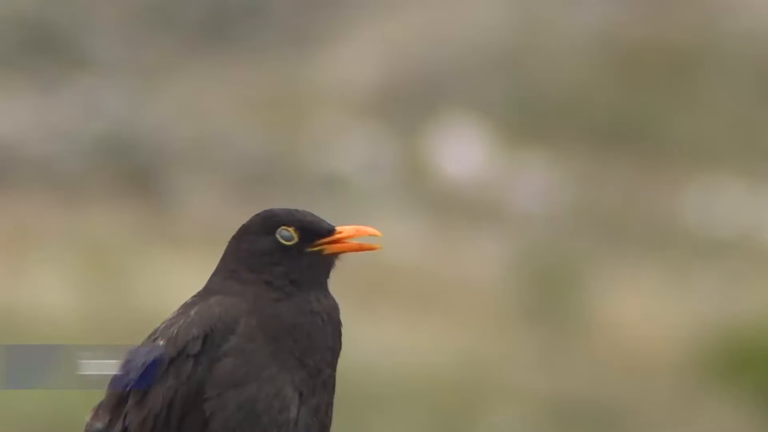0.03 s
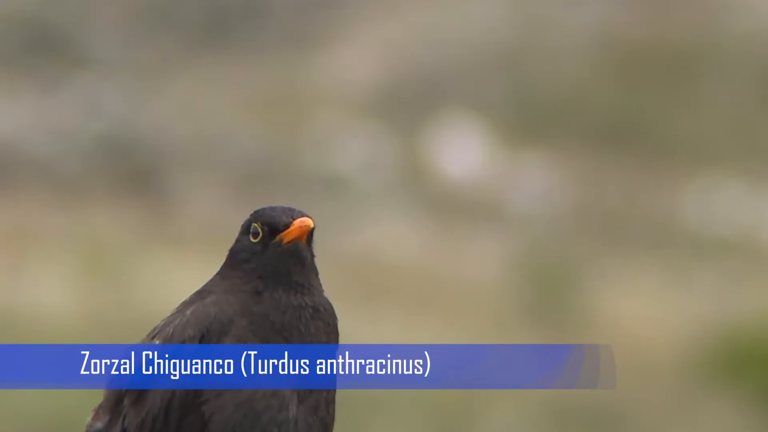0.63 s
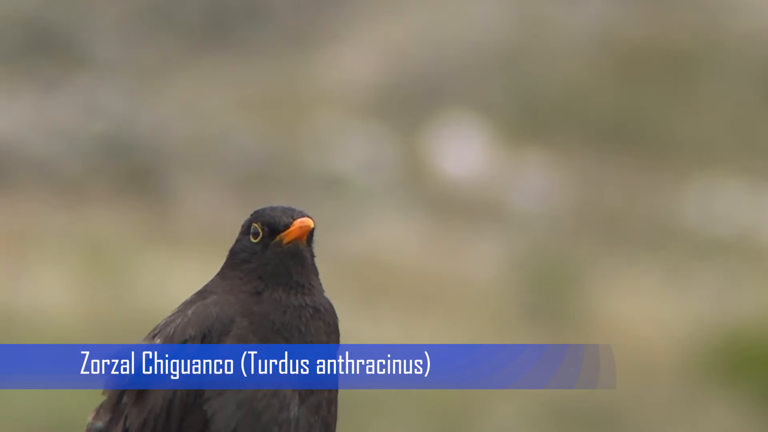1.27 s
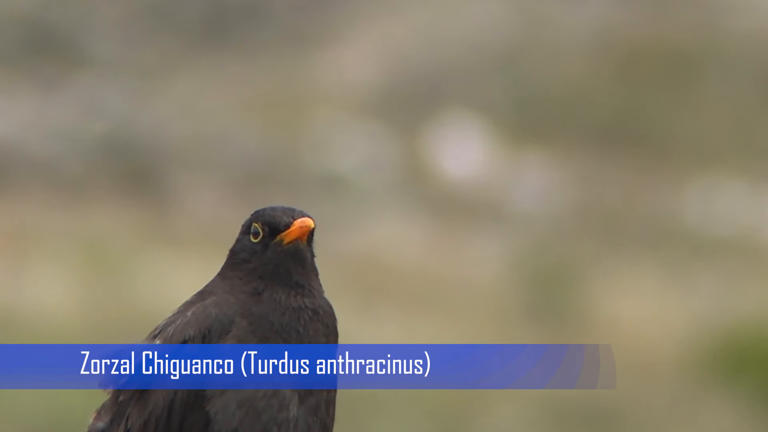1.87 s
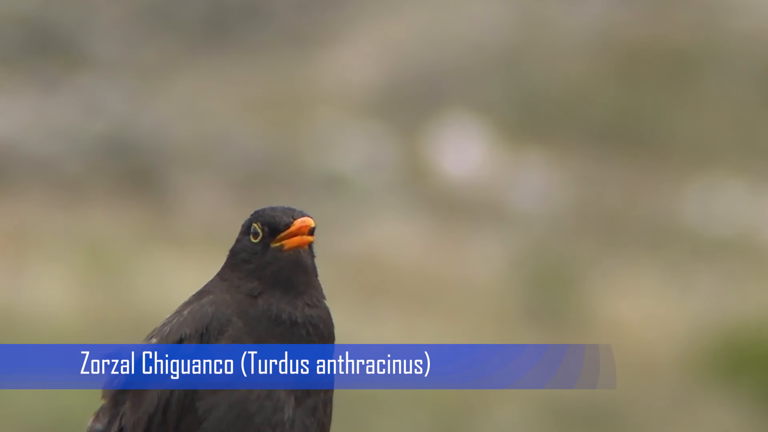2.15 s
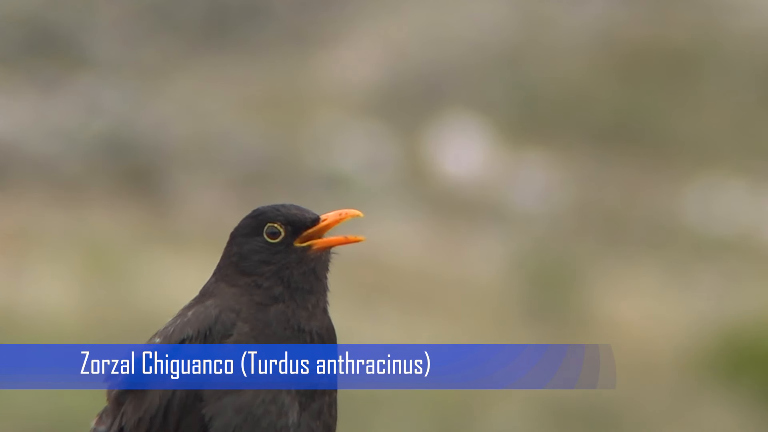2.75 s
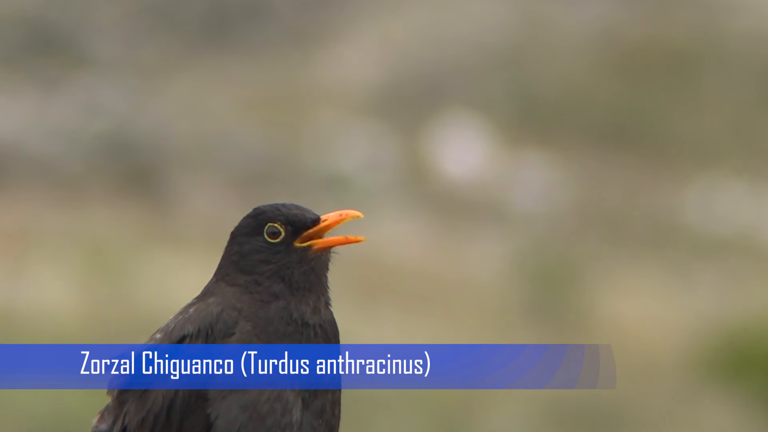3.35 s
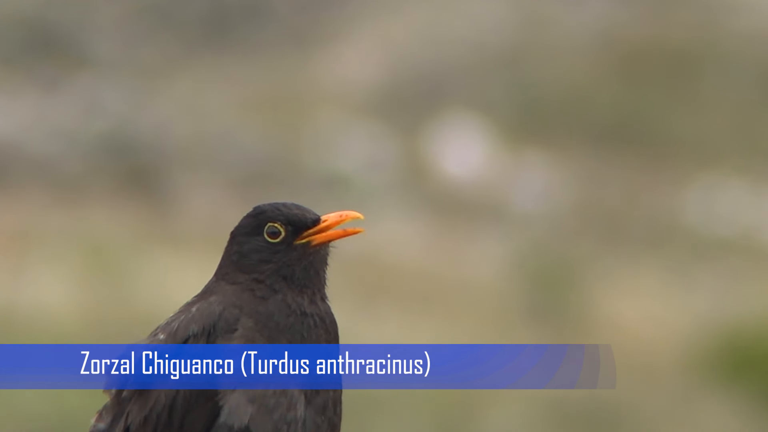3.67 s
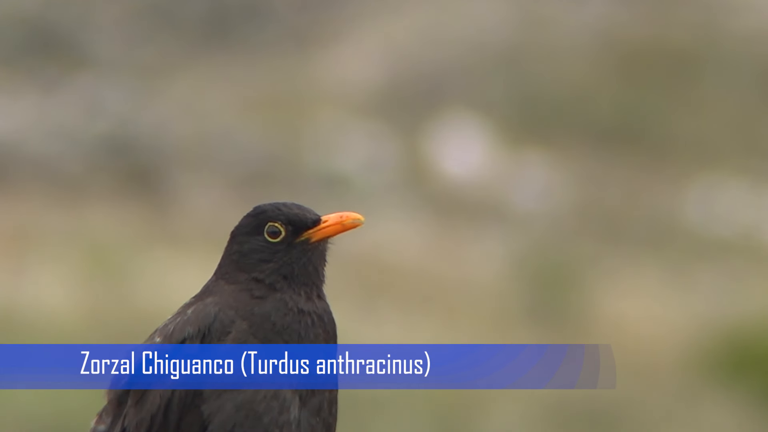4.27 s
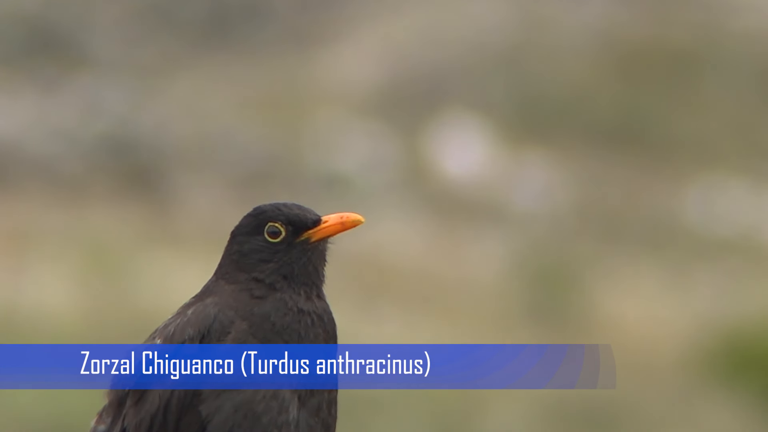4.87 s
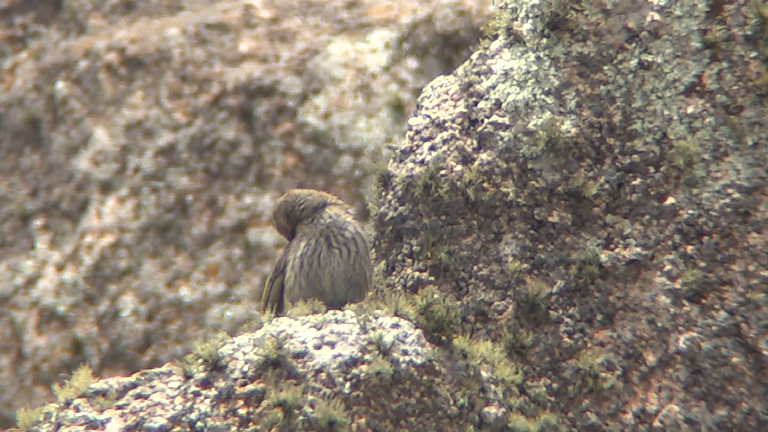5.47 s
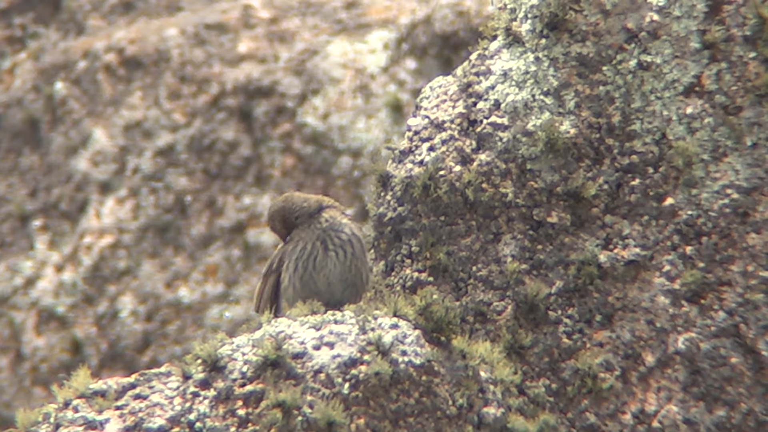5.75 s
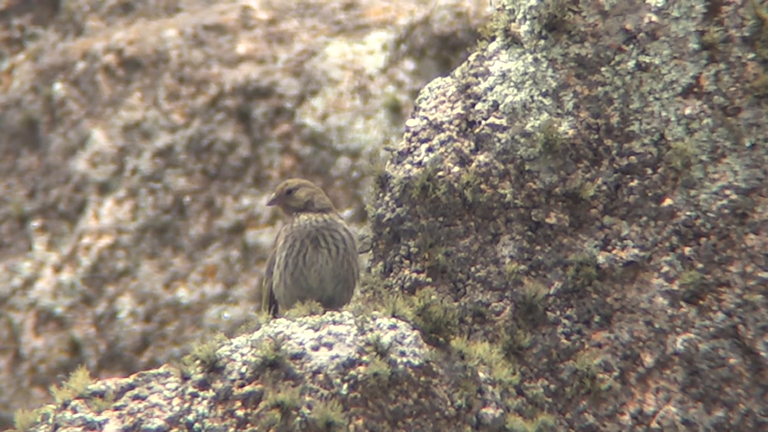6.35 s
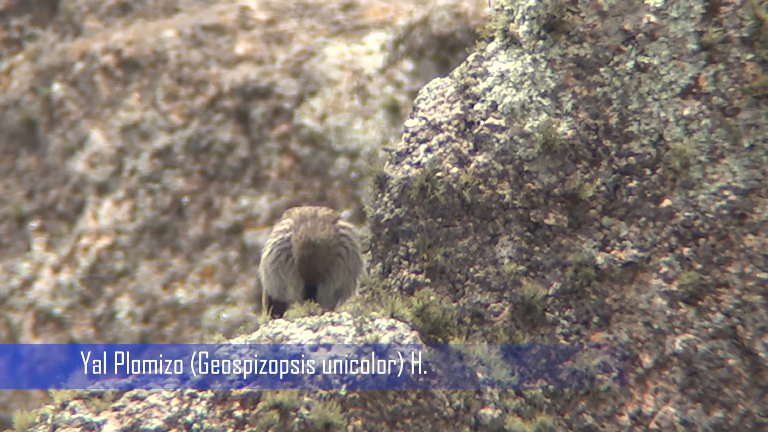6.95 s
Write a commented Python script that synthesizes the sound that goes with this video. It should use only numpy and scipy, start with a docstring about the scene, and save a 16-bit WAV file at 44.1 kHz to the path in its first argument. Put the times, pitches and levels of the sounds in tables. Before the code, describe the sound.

Outdoors on a rocky hillside, wind buffets the microphone with a low, uneven rumble and soft thuds, strongest a little after 1 second. A soft hiss lies underneath. Small birds tick faintly far away at the start, then chip and trill from about 1.5 to 2.5 seconds. At 2 seconds a nearby thrush begins a clear, loud phrase of quick whistles, warbles and slurred notes, ending in a high falling twitter at 4 seconds, with a light echo from the rocks. A very faint distant motor hums, swelling slightly around 3 seconds. The wind eases after the phrase, and a few thin, buzzy peeps come from afar around 5 to 5.5 seconds. At 5.5 seconds the sound drops out for an instant and returns quieter. From 6 seconds to the end, just past 7, the thrush sings a similar opening, softer and slightly slower, over lighter gusts.

```python
"""A thrush sings two phrases on a rocky hillside: whistles, warbles and a two-voiced twitter.
Its voice box (the syrinx) has two sides, and each can vibrate in the breath to make its own tone.
Small birds answer from far off, the rocks echo, wind buffets the microphone and a distant motor
drones over a soft hiss. The sound drops out briefly between the phrases; after that it is quieter."""
import sys
import numpy as np
from scipy import signal
from scipy.fft import rfft, irfft
from scipy.io import wavfile
from scipy.ndimage import uniform_filter1d

SR = 44100
rng = np.random.default_rng(int(sys.argv[2]) if len(sys.argv) > 2 else 0)


def waveform_to_disk(signal):
    """Save audio, clipped to [-1, 1], as 16-bit WAV at the path in sys.argv[1]."""
    frames = np.transpose(np.atleast_2d(signal))
    scaled = np.clip(frames, -1, 1) * 32767
    samples = np.round(scaled).astype(np.int16)
    wavfile.write(sys.argv[1], SR, samples)


N = 317961
T = np.arange(N) / SR
DROPOUT_START_S, DROPOUT_END_S = 5.502, 5.539

# the shapes of the thrush's syllables: t/s from the start, f/Hz, level/dB
OPENING = [(0, 2550, -25), (.016, 2460, -12.5), (.045, 2620, -9.5), (.1, 2670, -4.5), (.135, 2740, -2.5),
           (.16, 2760, 0), (.175, 2790, -2.5), (.181, 2760, -12)]
STEP = [(0.0, 3040, -33.5), (0.011, 2930, -14), (0.028, 2960, -5.5), (0.048, 2930, -2.5),
        (0.056, 3550, -2.5), (0.066, 3300, -0.8), (0.095, 3250, -3), (0.103, 3220, -9.5),
        (0.155, 3180, -10)]
WARBLE = [(0, 2606, -30.5), (.011, 2388, -15), (0.025, 2382, -6), (.034, 2543, -2), (.062, 2680, -2),
          (0.081, 2750, -2), (.1, 2790, 0.5), (.135, 2827, -1), (.155, 2788, -4.5), (.162, 2744, -22)]
ARCH = [(0, 3414, -25.5), (.014, 3800, -9), (.037, 4040, -3.5), (.046, 4790, -15.5), (.051, 3418, 2),
        (.066, 3317, -2), (.081, 3420, 0), (.096, 3673, -8), (.122, 3790, -3.5), (.143, 2910, -1),
        (.152, 2663, -7.5), (.166, 2436, -4.5), (.181, 2077, -19)]
SLUR = [(0.0, 2350, -24), (0.014, 2462, -4), (0.022, 2460, 1.6), (0.061, 2200, -3), (0.066, 2380, -5),
        (0.071, 2174, -0.5), (0.077, 2427, -3.5)]
WAVE = [(0, 3970, -18), (.021, 4230, -7), (.033, 3850, -2), (.049, 3116, -5), (.061, 2860, -6),
        (.076, 3035, -5.5), (.085, 3577, -1), (.095, 3680, -2), (.116, 3340, 1.5), (.125, 3130, -9.5),
        (.134, 3044, -1.5), (.149, 2576, -23.5)]
DIP = [(0, 2632, -23), (.011, 2752, -9.5), (.028, 2662, -4), (.044, 2754, -7), (.05, 2912, 0),
       (.059, 2653, -5), (.067, 2530, -3), (.078, 2220, -7.5), (.092, 2368, -5), (.116, 2510, -6.5)]
RATTLE = [(0, 4300, -12), (.009, 4230, -2), (.019, 4320, -11), (.028, 3950, 1), (.04, 3210, 0.5),
          (.062, 3180, -0.5), (.083, 2950, -6), (.089, 2930, -27.5)]
CHINK = [(0, 7100, -16), (.003, 6950, -1), (.01, 6250, 0), (.017, 6850, -5), (.023, 6600, -17)]
FLICK = [(0, 3230, -12.5), (.013, 3903, -4.5), (0.0178, 5210, -14), (.022, 3480, 1.5), (.028, 3326, -7),
         (.035, 3828, -7), (.038, 4600, -28), (.041, 3760, -1), (.046, 3217, -22)]
SLIDE = [(0.0, 3130, -32), (0.018, 2970, -12.3), (0.048, 2910, -5.5), (0.057, 3746, -3.5), (0.08, 3540, -5),
         (0.102, 3320, -1.2), (0.147, 3217, -4), (0.16, 3100, -17)]
# the shapes of its second, higher voice: t/s from the start, f/Hz, level/dB
SLUR_HIGH = [(0, 3800, -9.5), (.01, 3900, 1.5), (.024, 4000, -3), (.038, 4100, -22)]
RATTLE_HIGH = [(0, 5746, 0), (.012, 5700, -4.5), (.022, 5300, -7), (.032, 5060, -12), (.07, 5000, -18)]
CHINK_HIGH = [(0, 9900, -19), (.003, 10100, -3), (.01, 7550, 0), (.017, 9300, -11), (.023, 8100, -14),
              (.027, 8500, -19), (.031, 8100, -30)]


def thrush():
    """The two sides of the voice box disturb each other, adding extra tones and a slight rasp."""
    swing_hz, thinning = warble()
    low, high = low_voice(swing_hz, thinning), high_voice(swing_hz)
    rasp = undb(-15.5) * high * noise([(100, 3), (2000, -1), (5000, -7.5), (10000, -30)])
    extra_tones = undb(14.5) * low * high  # at the sum and the difference of the two pitches
    throat = signal.butter(4, [2300, 9500], "band", fs=SR, output="sos")
    return low + high + signal.sosfilt(throat, extra_tones + rasp)


def low_voice(swing_hz, thinning):
    """The lower side of the voice box carries the tune, trembling a little in level."""
    # the tune; the second phrase is like the start of the first, but softer and a little slower:
    # start/s, shape, time stretch, level/dB, second harmonic/dB, third harmonic/dB
    song = [(2.024, OPENING, 1.004, -31.5, -20.5, -27), (2.255, STEP, 1.006, -18.5, -25, -28),
            (2.48, WARBLE, 1, -20, -27, -33.5), (2.69, ARCH, 1, -17, -22, -30.5),
            (2.945, SLUR, 1.074, -23.5, -20.5, -25), (3.172, WAVE, 0.99, -17, -22.5, -25.5),
            (3.393, DIP, 0.98, -22, -17, -26), (3.509, RATTLE, 1, -24.5, -16.5, -24),
            (3.62, CHINK, 1, -26, -17, -25), (3.827, FLICK, 1.025, -22.5, -19.5, -26),
            (6.056, OPENING, 1.043, -40.5, -16.5, -34.5), (6.3, SLIDE, 1.004, -28.5, -31, -40),
            (6.527, WARBLE, 1.09, -30, -25, -39), (6.746, ARCH, 1.033, -31.5, -26.5, -34),
            (6.993, SLUR, 1.204, -33.5, -22, -40)]
    # quick falling notes, four after each slur and five under the twitter:
    # start/s, length/s, top/Hz, end/Hz, bend (over 1 falls late), level/dB
    falls = [(3.027, .017, 3050, 2376, .8, -21.5), (3.045, .018, 3150, 2463, 1.72, -22.5),
             (3.063, 0.016, 3150, 2548, 1.55, -21), (3.08, 0.017, 2900, 2720, 1.39, -24),
             (3.885, 0.019, 6610, 2598, .65, -32), (3.918, .016, 5800, 2850, .7, -38),
             (3.95, .015, 5400, 2815, .8, -33), (3.968, 0.021, 4100, 2850, .8, -36),
             (3.991, .038, 3100, 1665, 0.83, -40), (7.088, 0.014, 3020, 2370, 0.82, -29.5),
             (7.104, 0.018, 3150, 2540, 1.13, -30), (7.123, 0.022, 3100, 2700, 0.95, -28),
             (7.144, 0.014, 2860, 2720, 1.4, -33)]
    # the throat favours the second harmonic of some pitches: f/Hz, lift/dB
    throat_lift = [(2200, -2), (2450, -1), (2800, -5), (3300, -5), (3750, 1.5), (4200, 1)]
    syllables = [syllable(*row) for row in song] + [falling_note(*row) for row in falls]
    hz, strength, second_db, third_db = voice_curves(syllables)
    strength = strength * undb(wander(128))
    second_db = second_db + np.interp(hz, *np.transpose(throat_lift))
    return whistle(hz + swing_hz, strength * thinning, second_db, third_db)


def high_voice(swing_hz):
    """The higher side joins in for three syllables and the twitter, where it flutters hard."""
    # where this voice joins in: start/s, shape, time stretch, level/dB
    duets = [(2.958, SLUR_HIGH, 0.88, -43.5), (3.52, RATTLE_HIGH, 0.94, -36.5),
             (3.62, CHINK_HIGH, 0.99, -23.5)]
    # a fast flutter that deepens as the voice falls: t/s, rate/Hz, depth (0-1)
    flutter = [(3.94, 888, 0.06), (3.96, 903, 0.3), (3.98, 851, 0.31), (4.0, 778, 0.5), (4.03, 598, .35)]
    hz, strength = voice_curves([syllable(*row) for row in duets] + [twitter()])
    tone = whistle(hz + swing_hz, strength, second_db=-20, third_db=-34.5, jitter=.0091, shimmer_db=1)
    flutter_hz, depth = curves(flutter)
    flutter_phase = 2 * np.pi * np.cumsum(flutter_hz * (1 + .082 * wander(300))) / SR
    return tone * (1 + depth * np.sin(flutter_phase))


def whistle(hz, strength, second_db, third_db, jitter=.002, shimmer_db=.2):
    """Vibrating folds make a nearly pure tone; its weak overtones grow when the bird pushes harder."""
    hz = hz * (1 + jitter * wander(500))
    phase = 2 * np.pi * np.cumsum(hz) / SR
    push = np.abs(strength / undb(-20)) ** .093
    tone = np.sin(phase)
    for k, db in enumerate([second_db, third_db, third_db - 15, third_db - 19.5], 2):
        tone += push * undb(db + 2 * wander(30)) * np.sin(k * phase) * (k * hz < SR / 2)
    return tone * np.sqrt(2) * strength * undb(shimmer_db * wander(250))


def warble():
    """Muscles swing the pitch up and down; the tone thins on each slope."""
    # first crest/s, last crest/s, first rate/Hz, last rate/Hz, first swing/Hz, last swing/Hz, dip/dB
    warbles = [(2.085, 2.209, 52.3, 50.8, 147, 247, 3.5), (2.529, 2.64, 59.7, 53.1, 165, 157, 4),
               (3.479, 3.5, 92, 95, 70, 70, 4), (3.513, 3.538, 103.1, 108, 925, 380, 5.5),
               (3.5523, 3.583, 102.5, 92, 232.7, 242, 4.5), (6.101, 6.245, 58.1, 46.1, 141.3, 147, 7.5),
               (6.578, 6.679, 60.4, 48.9, 184, 108.9, 6.5)]
    swing_hz, thinning_db = np.zeros(N), np.zeros(N)
    for first, last, rate0, rate1, swing0, swing1, dip_db in warbles:
        turns = np.cumsum(np.interp(T, [first, last], [rate0, rate1])) / SR
        angle = 2 * np.pi * (turns - turns[int(first * SR)])
        turns_outside = np.maximum((first - T) * rate0, (T - last) * rate1)
        active = np.clip(1.5 - 2 * turns_outside, 0, 1)
        swing_hz += active * np.interp(T, [first, last], [swing0, swing1]) * np.cos(angle)
        thinning_db += active * dip_db * np.sin(angle) ** 2
    return swing_hz, undb(-thinning_db)


def twitter(lead_s=.0111, onset_db=-21, crest_db=-5, slope_db=-3.5):
    """The first phrase ends in swoops of pitch, loudest at the bottom, and then falls away."""
    # swoops that sink and quicken: crest/s, crest/Hz, trough/s, trough/Hz, level/dB
    swoops = [(3.891, 7750, 3.901, 4635, -27), (3.922, 7470, 3.935, 4746, -27),
              (3.953, 6810, 3.965, 4250, -28), (3.976, 5400, 3.987, 3754, -26.5)]
    # the final fall: t/s from the last trough, f/Hz, level/dB
    last_fall = [(.001, 3780, 4.5), (.007, 4403, -5), (.019, 3408, -1), (.026, 3060, -5.5),
                 (.031, 2893, -8), (.04, 2394, -12), (.044, 2340, -23)]
    first_s, _, _, first_low_hz, first_db = swoops[0]
    turns = [(first_s - lead_s, first_low_hz, first_db + onset_db)]
    for crest_s, crest_hz, trough_s, trough_hz, db in swoops:
        turns += [(crest_s, crest_hz, db + crest_db), (trough_s, trough_hz, db)]
    rows = []
    for (s0, hz0, db0), (s1, hz1, db1) in zip(turns, turns[1:]):
        for u in np.arange(10) / 10:
            hz = hz0 + (hz1 - hz0) * np.sin(np.pi * u / 2) ** 2
            db = db0 + u * (db1 - db0) + slope_db * np.sin(np.pi * u) ** 2
            rows.append((s0 + u * (s1 - s0), hz, db))
    end_s, _, end_db = turns[-1]
    return rows + syllable(end_s, last_fall, 1, end_db)


def syllable(start, shape, stretch, level_db, *overtones):
    """Place one shape in the song, as rows of time, pitch, level and overtones."""
    return [(start + s * stretch, hz, level_db + db, *overtones) for s, hz, db in shape]


def falling_note(start, length, top_hz, end_hz, bend, level_db, edge_db=-12, second_db=-24, third_db=-39):
    """A short note that swells and fades while its pitch drops."""
    return [(start + u * length, top_hz + (end_hz - top_hz) * u ** bend,
             level_db + edge_db * (1 - np.sin(np.pi * u)), second_db, third_db)
            for u in np.linspace(0, 1, 10)]


def voice_curves(syllables, glide_s=.00079, edge_s=.002):
    """Pitch, strength and overtones of one side of the voice box, which shuts between syllables."""
    hz, db, *overtones = curves(sorted(row for rows in syllables for row in rows))
    is_open = np.any([(T >= rows[0][0]) & (T <= rows[-1][0]) for rows in syllables], axis=0)
    return smooth(hz, glide_s), smooth(undb(db) * is_open, edge_s), *overtones


def far_birds():
    """Small birds tick, trill and call thinly from across the slope."""
    # even runs of falling ticks: first/s, last/s, rough gap/s, top/Hz, end/Hz, length/s, level/dB
    tick_runs = [(-.012, .331, .057, 5300, 3500, 0.025, -59.5), (1.811, 1.963, .051, 4500, 3300, .015, -54),
                 (2.222, 2.432, .052, 4650, 3200, .015, -56)]
    # chips that rise and then drop: crest/s, crest/Hz, rise/s, level/dB
    chips = [(1.601, 3870, 0.02, -59.5), (1.667, 4300, 0.021, -53), (1.727, 4680, 0.024, -50),
             (1.777, 4700, .014, -52.5), (2.021, 4330, 0.019, -53), (2.08, 4900, 0.02, -48.5),
             (2.133, 4870, 0.018, -44.5), (2.181, 4780, .012, -49.5)]
    # thin whistles and buzzes: start/s, length/s, start/Hz, middle/Hz, end/Hz, buzz (0-1), level/dB
    peeps = [(0.053, 0.053, 4650, 4650, 4470, 0.5, -54.5), (0.367, .125, 3150, 3600, 4020, 0.3, -67.5),
             (1.587, 0.082, 5560, 5340, 5450, 0.13, -48), (4.766, 0.024, 3570, 3660, 3680, .6, -62),
             (4.92, 0.015, 3700, 3680, 3660, .5, -62.5), (5.164, .054, 4580, 4670, 4460, 0.76, -53.5),
             (5.292, 0.055, 4690, 4650, 4470, 0.57, -49.5), (5.425, 0.057, 4620, 4720, 4470, 0.43, -49)]
    out = np.zeros(N)
    for first, last, gap, top_hz, end_hz, length, db in tick_runs:
        for s in np.linspace(first, last, round((last - first) / gap) + 1):
            add_chirp(out, s, [0, length], [top_hz, end_hz], db + 2.2 * rng.standard_normal())
    for s, hz, rise, db in chips:
        add_chirp(out, s - rise, [0, rise, rise + .012], [hz - 42000 * rise, hz, 3000], db)
    for s in np.linspace(1.795, 2.408, 13):  # high rising notes between the chips and ticks
        add_chirp(out, s, [0, .012, .024], [5100, 5350, 5750], db=-57.5)
    for s, length, *pitches, buzz, db in peeps:
        add_chirp(out, s, [0, length * .4, length], pitches, db, buzz)
    return out


def add_chirp(out, start, times, pitches, db, buzz=0, buzz_hz=235, swing_hz=130, rasp_hz=550):
    """Add a small bird's note: a glide that swells and fades; a buzz pulses it and makes it hoarse."""
    t = np.arange(int(times[-1] * SR)) / SR
    pulse = 2 * np.pi * buzz_hz * t
    hz = np.interp(t, times, pitches) + buzz * swing_hz * np.sin(pulse)
    hz += (.2 + buzz) * rasp_hz * smooth(rng.standard_normal(len(t)), .001)
    swell = signal.windows.tukey(len(t), .5) * (1 + buzz * np.cos(pulse))
    note = np.sqrt(2) * undb(db) * np.sin(2 * np.pi * np.cumsum(hz) / SR) * swell
    at = int(start * SR) + np.arange(len(t))
    heard = (at >= 0) & (at < N)
    out[at[heard]] += note[heard]


def hillside_echo(x):
    """Near rocks scatter the sound at once; the far slope sends back a faint tail."""
    # how strongly the sound comes back: delay/s, level/dB
    returns = [(.004, 2), (.03, 6), (.07, -8.5), (.14, -15), (.22, -19), (.35, -27.5), (.47, -17),
               (.6, -52.5)]
    s, db = np.transpose(returns)
    t = np.arange(int(s[-1] * SR)) / SR
    fade = undb(np.interp(t, s, db)) * (t > s[0])
    shared, left, right = rng.standard_normal((3, len(t)))
    scatter = (.5 * shared + np.array([left, right])) * fade
    dulled = signal.sosfilt(signal.butter(2, 5200, fs=SR, output="sos"), scatter)
    return signal.fftconvolve(x[None], dulled / np.sqrt(np.sum(fade ** 2)), axes=1)[:, :N]


def wind():
    """Swirling air rumbles on the microphone, brighter when strong; the hardest swirls thud."""
    # how the rumble leans between left and right: t/s, left minus right/dB
    sides = [(0, -1), (1.2, -1.5), (1.7, -4.5), (2.5, 0.7), (4.2, -1.8), (5.45, 0.5), (5.6, 4), (6.2, 0),
             (7.2, -2)]
    # tone colour of the rumble: f/Hz, level/dB
    rumble_colour = [(15, -20), (30, 1), (60, 4.5), (100, 1), (150, -13.5), (200, -25), (300, -36.5),
                     (600, -56), (1500, -93)]
    # single thuds: t/s, f/Hz, peak/dB
    thuds = [(0.382, 86, -31.5), (0.602, 89, -28.5), (1.157, 147, -30.5), (1.202, 73, -26.5),
             (1.281, 65, -29), (1.339, 180, -27), (1.345, 65, -33), (3.894, 92.3, -30.5),
             (4.119, 100, -30.5)]
    db = wind_level()
    side_db, = curves(sides)
    rumble = noise(rumble_colour)
    rumble /= smooth(rumble ** 2, .1) ** .43  # even it out, so the gusts set the loudness
    swirls = noise([(40, -25.5), (110, 4.5), (170, -.5), (240, -11.5),
                    (320, -31), (500, -34), (1500, -68.5)])
    swirls = undb(-14 + .5 * (db + 45)) * pan(swirls, -6)  # small swirls hit the right side harder
    out = undb(db - 1.5) * (rumble + swirls)
    for s, hz, peak_db in thuds:
        turns = (T - s) * hz
        out += undb(peak_db) * np.exp(-(turns / .63) ** 2) * np.cos(2 * np.pi * turns)
    width = undb(db - 29) * noise(rumble_colour) * np.array([[1], [-1]])
    return out * undb(np.array([side_db, -side_db]) / 2) + width


def wind_level():
    """The wind's level in dB: each gust swells and dies away on top of the breeze."""
    # the breeze between gusts: t/s, level/dB
    breeze = [(0, -64), (.35, -57), (1.5, -54.5), (2.8, -62.5), (3.6, -56.5), (4.25, -55), (4.6, -66),
              (5.6, -62), (6.6, -63), (7.2, -56)]
    # gusts: peak/s, length/s, level/dB
    gusts = [(0.372, 0.12, -39.5), (0.57, .13, -41), (0.842, 0.22, -42), (1.151, 0.13, -37.5),
             (1.326, 0.12, -32), (1.496, 0.14, -41), (1.835, 0.2, -42.5), (2.014, 0.061, -46),
             (2.16, 0.053, -38), (2.268, 0.075, -37), (2.463, 0.16, -42), (2.674, 0.15, -45.5),
             (2.88, 0.091, -47), (3.098, 0.063, -37.5), (3.213, 0.057, -39.5), (3.37, 0.085, -41),
             (3.485, 0.057, -38.5), (3.569, .1, -36.5), (3.666, 0.096, -40), (3.892, .04, -38),
             (3.99, 0.073, -40), (4.107, .12, -40.5), (4.206, 0.062, -40), (4.73, .12, -57.5),
             (5.202, .14, -48), (5.445, .12, -46.5), (5.581, 0.12, -43.5), (5.75, 0.28, -50),
             (6.232, 0.14, -56), (6.901, 0.13, -42.5), (7.083, 0.25, -50.5)]
    power = undb(curves(breeze)[0]) ** 2
    for s, length, db in gusts:
        near = slice(max(0, int((s - 2 * length) * SR)), int((s + 2 * length) * SR))
        power[near] += undb(db) ** 2 * np.exp(-2 * (2 * (T[near] - s) / length) ** 2)
    return 10 * np.log10(power)


def motor():
    """A far engine whose harmonics fade in and out on the air; it ends at the dropout."""
    # the engine's hum: t/s, f/Hz, level/dB
    hum = [(0, 250, -78), (1.2, 252, -73), (1.6, 235, -73.5), (2.4, 258, -68), (2.6, 251, -71),
           (2.85, 244, -61), (3.17, 251, -61), (3.4, 245, -68), (3.9, 236, -74), (5.5, 245, -80)]
    hz, db = curves(hum)
    phase = 2 * np.pi * np.cumsum(hz * (1 + .012 * wander(40))) / SR
    out = np.zeros((2, N))
    for k, harmonic_db in enumerate([-.5, 3, -11, -8, -6.5], 1):
        # many paths over the land blur each harmonic, differently at each ear
        blur = .5 * np.array([wander(11), wander(42)])
        out += undb(harmonic_db + 3.2 * wander(9)) * np.sin(k * phase + blur)
    return out * undb(db) * (T < DROPOUT_START_S)


def air():
    """The valley murmurs under an even hiss."""
    # how the two rise and fall: t/s, murmur/dB, hiss/dB
    levels = [(0, -66.5, -70), (1.2, -63, -67.5), (3.5, -62, -64), (4.1, -61, -66), (4.6, -63, -67.5),
              (5.48, -64, -67), (5.6, -68.5, -72.5), (7.21, -69, -70.5)]
    # their tone colours: f/Hz, level/dB
    murmur_colour = [(30, -6.5), (60, 4), (90, 7), (140, 0.5), (260, 3), (380, -1.5), (700, -4.5),
                     (1250, -5), (1800, -10), (3000, -19.5), (6000, -24)]
    hiss_colour = [(300, -9.5), (1500, -2), (3000, 0.5), (4500, -0.5), (6300, 2), (8000, 3.5),
                   (10000, -0.5), (12500, 1), (15500, -5.5)]
    murmur_db, hiss_db = curves(levels)
    murmur = wide_noise(murmur_colour, -6.5) * undb(murmur_db + 4 + .91 * wander(7.2))
    hiss = wide_noise(hiss_colour, -4) * undb(hiss_db + 7)
    return murmur + hiss


def undb(db):
    """Turn decibels into a volume factor."""
    return 10 ** (np.asarray(db) / 20)


def curves(rows):
    """Join each column of a table with straight lines over time."""
    s, *columns = np.transpose(rows)
    return [np.interp(T, np.sort(s), column) for column in columns]


def smooth(x, seconds):
    """Round off the corners over a short time."""
    return uniform_filter1d(x, max(1, int(seconds * SR)))


def wander(rate_hz):
    """A smooth random wobble with a typical size of one."""
    points = rng.standard_normal(int(N / SR * rate_hz) + 3)
    x = smooth(np.interp(T * rate_hz, np.arange(len(points)), points), .5 / rate_hz)
    return x / x.std()


def noise(colour):
    """Noise with a typical size of one, shaped by rows of f/Hz, level/dB."""
    hz, db = np.transpose(colour)
    f = np.maximum(np.fft.rfftfreq(N, 1 / SR), 1)
    gain = undb(np.interp(np.log(f), np.log(hz), db))
    x = irfft(rfft(rng.standard_normal(N)) * gain, N)
    return x / x.std()


def wide_noise(colour, width_db):
    """Shaped noise spread between left and right."""
    return noise(colour) + undb(width_db) * noise(colour) * np.array([[1], [-1]])


def pan(x, side_db):
    """Place a sound between the ears; side_db is left minus right."""
    return x * undb(np.array([[side_db], [-side_db]]) / 2)


def scene():
    """The near thrush and far birds with their echoes, over wind, motor and open air."""
    song, answers = thrush(), far_birds()
    near = pan(song, -.46) + undb(-19) * hillside_echo(song)
    far = undb(-2.5) * answers + undb(-11) * hillside_echo(answers)
    return near + far + wind() + motor() + air()


def record(dry):
    """The sound drops out for a moment, and the highest treble is cut off."""
    silent = (T > DROPOUT_START_S) & (T < DROPOUT_END_S)
    treble_cut = signal.ellip(10, .1, 70, 15800, fs=SR, output="sos")
    return signal.sosfilt(treble_cut, dry * smooth(1. - silent, .0014))


dry = scene()
out = record(dry)
waveform_to_disk(out)
```